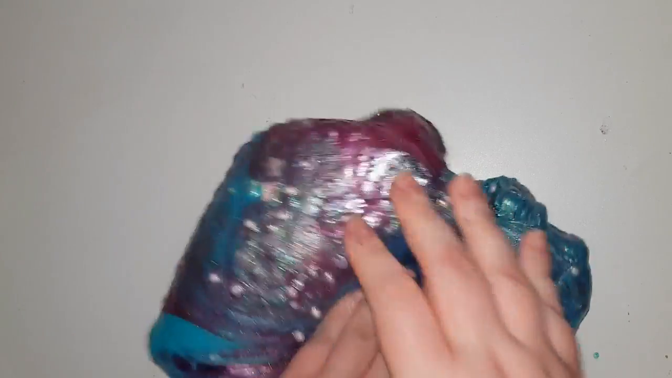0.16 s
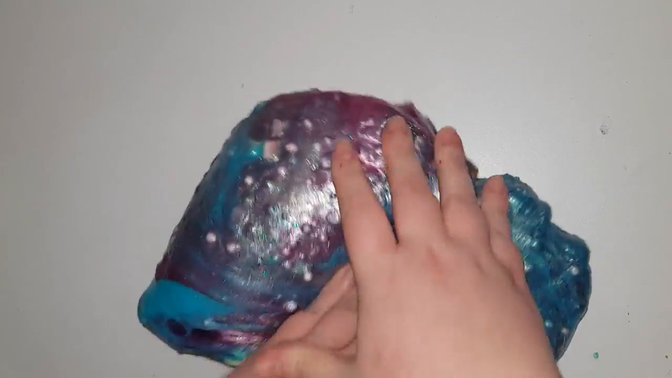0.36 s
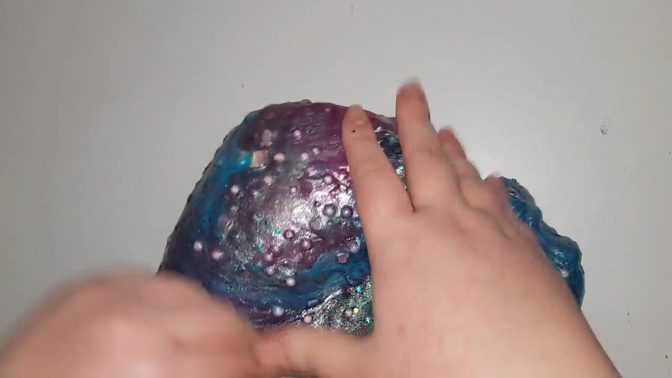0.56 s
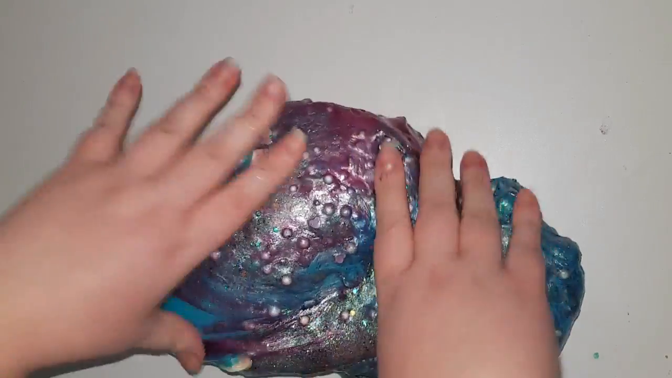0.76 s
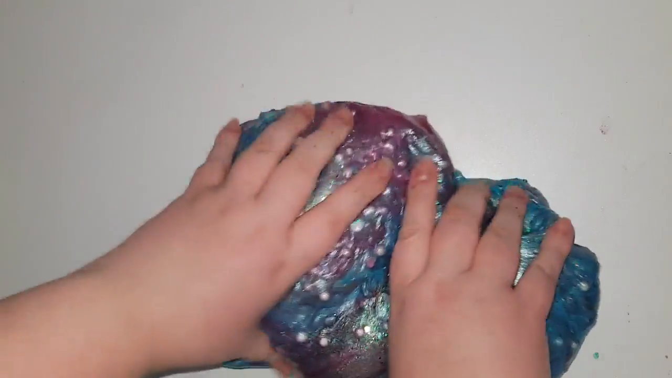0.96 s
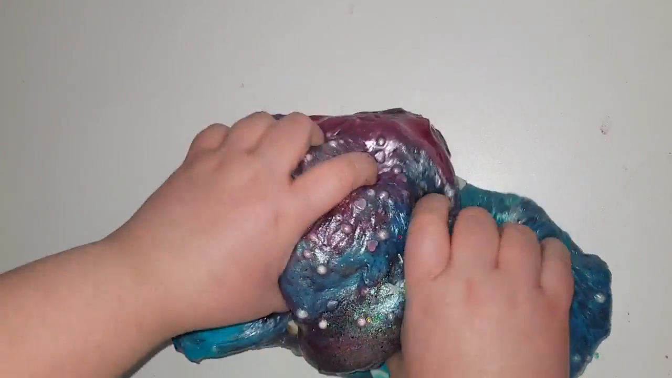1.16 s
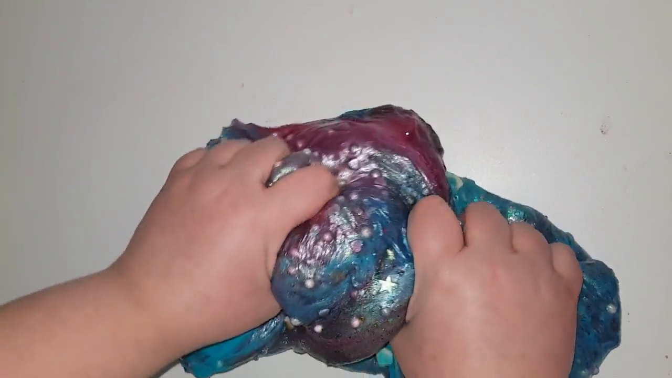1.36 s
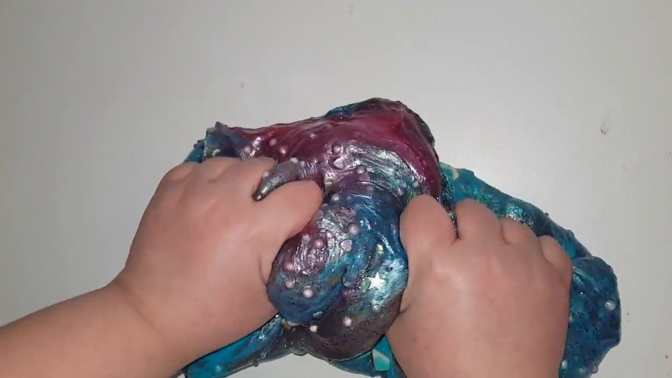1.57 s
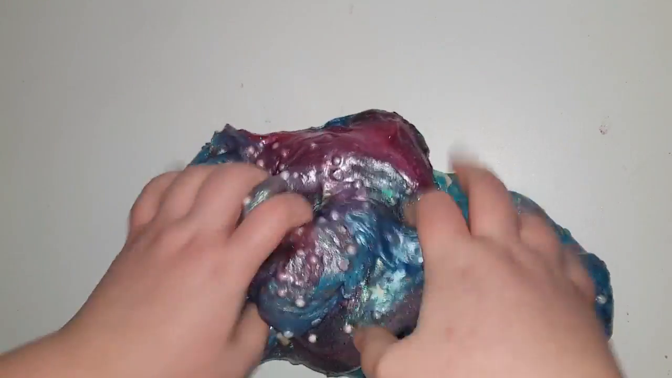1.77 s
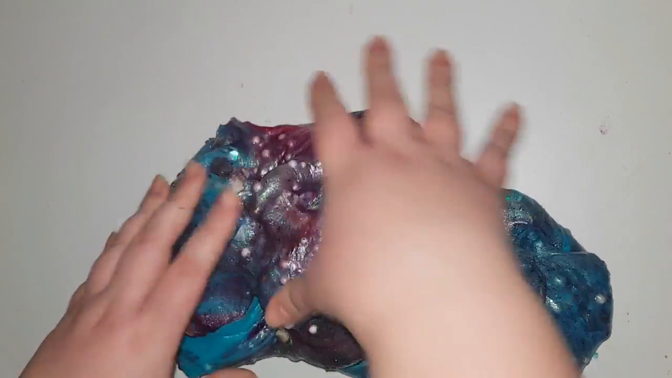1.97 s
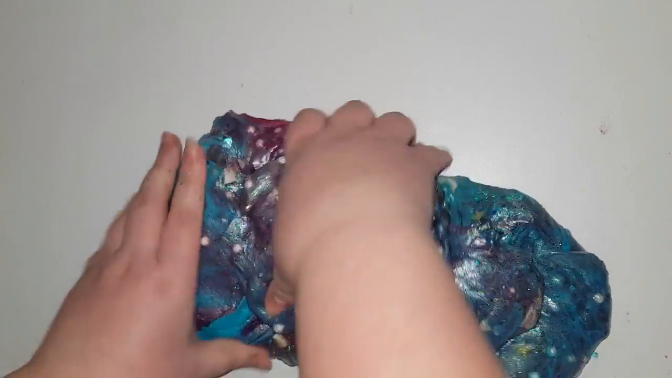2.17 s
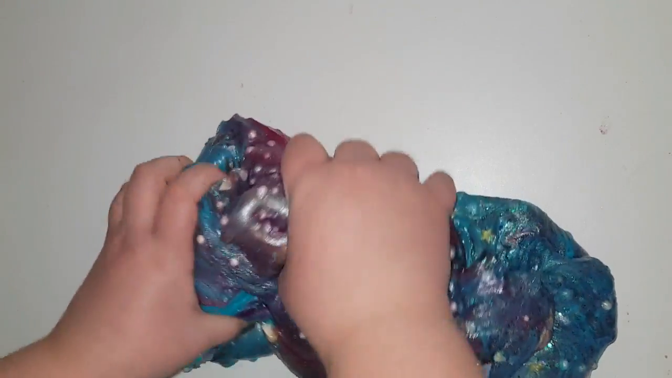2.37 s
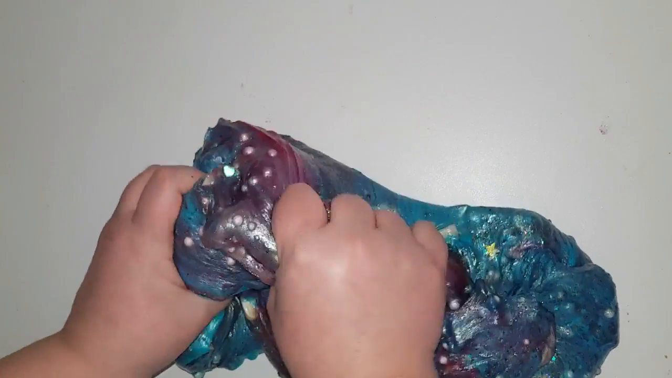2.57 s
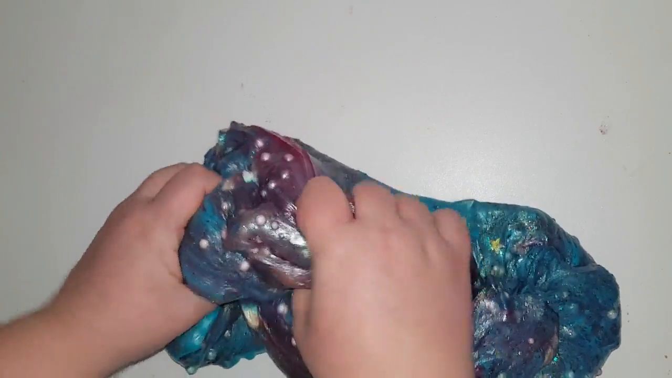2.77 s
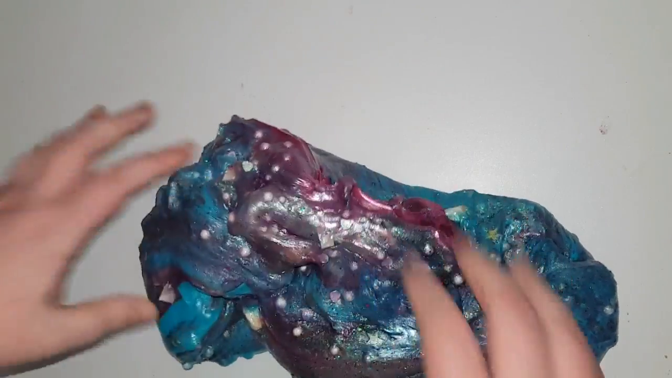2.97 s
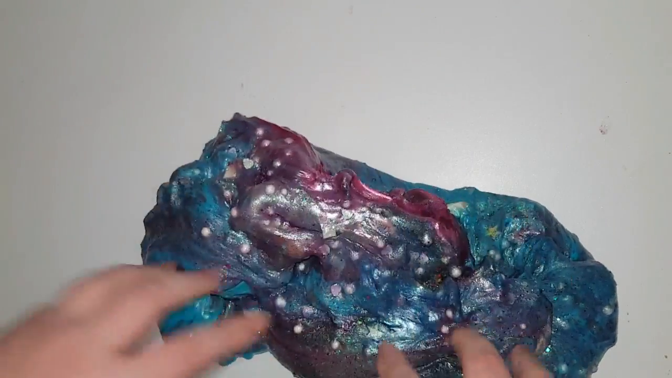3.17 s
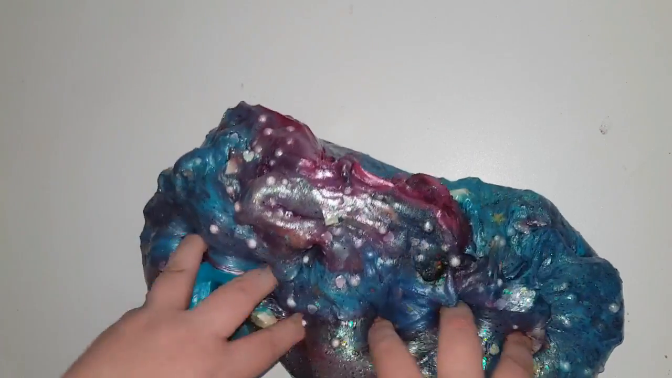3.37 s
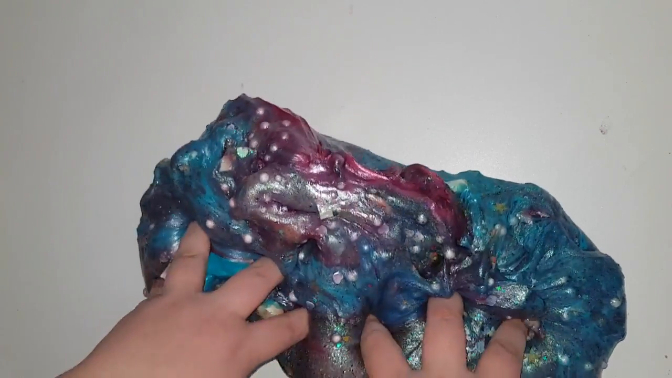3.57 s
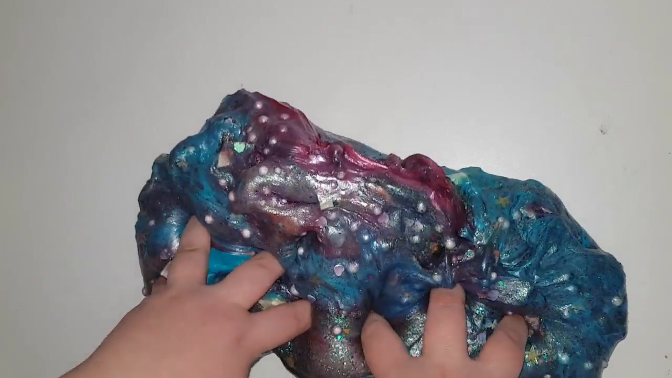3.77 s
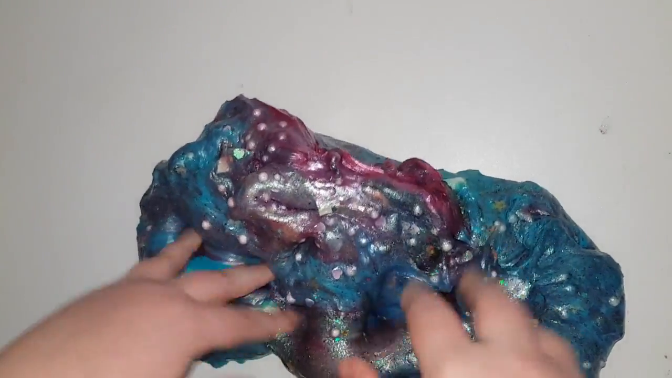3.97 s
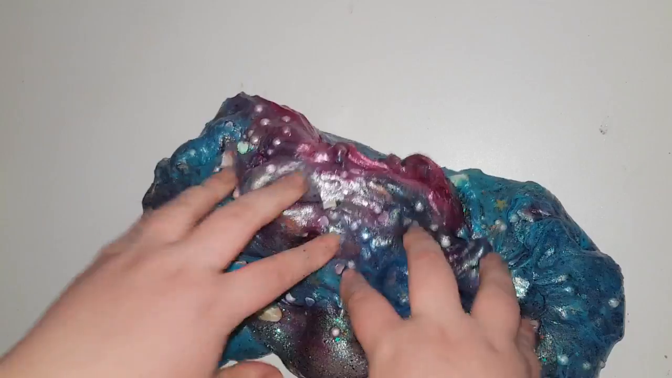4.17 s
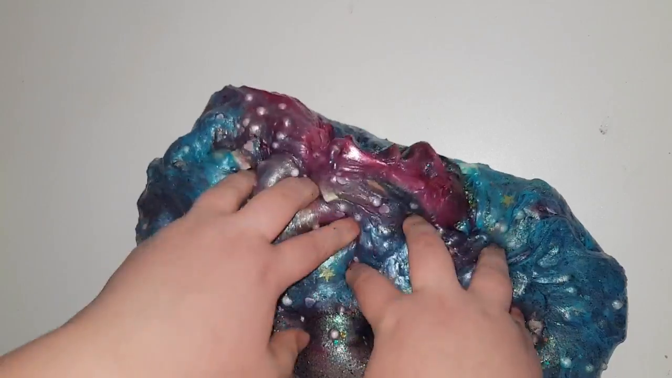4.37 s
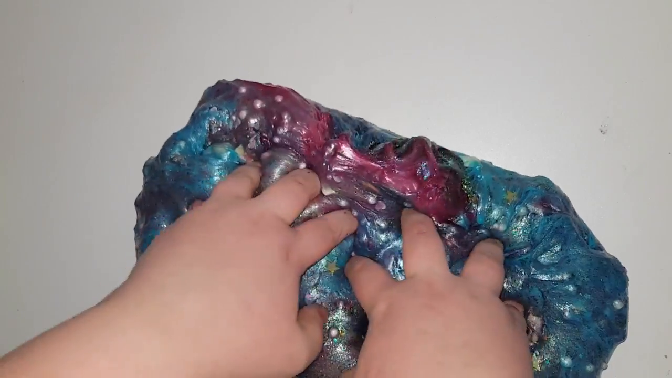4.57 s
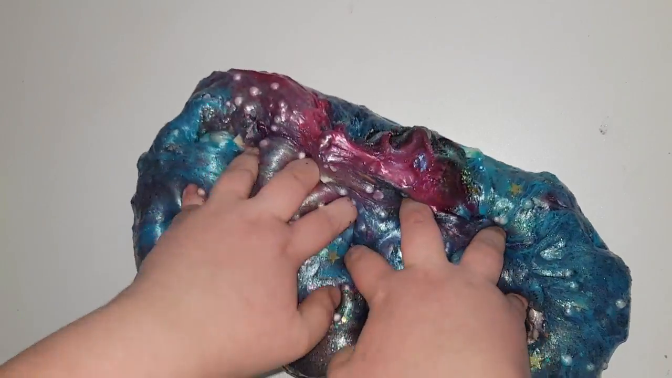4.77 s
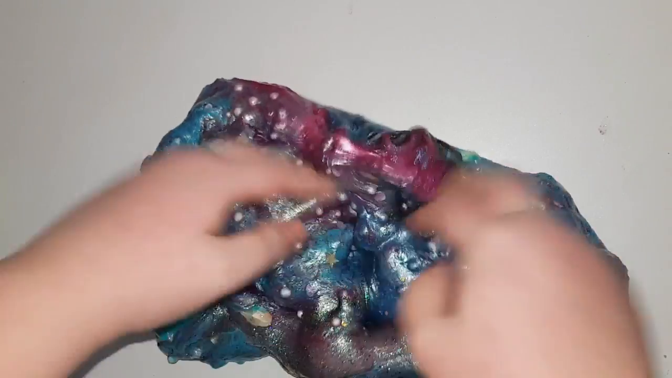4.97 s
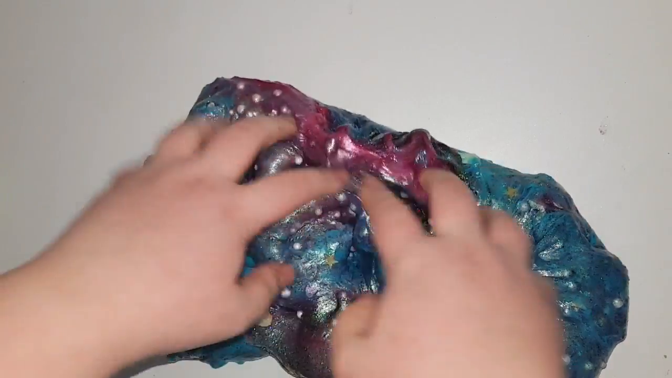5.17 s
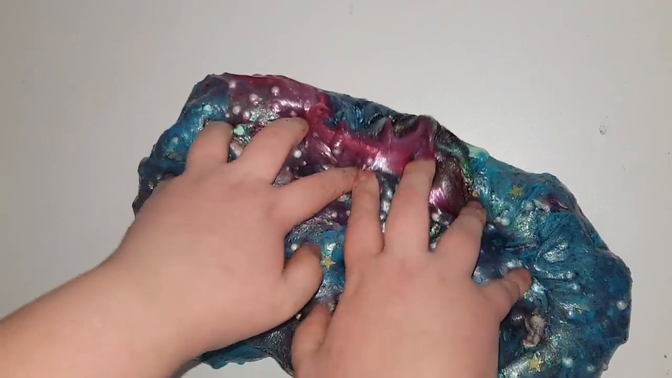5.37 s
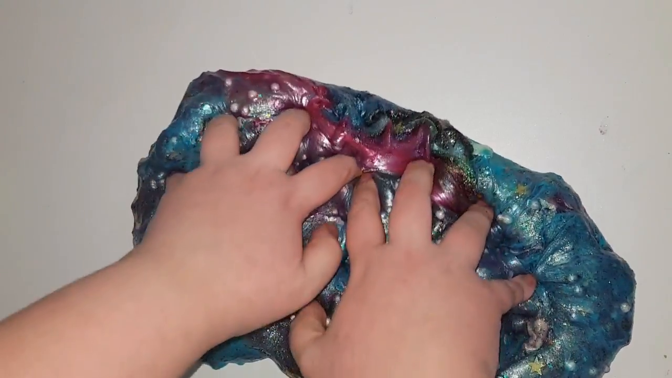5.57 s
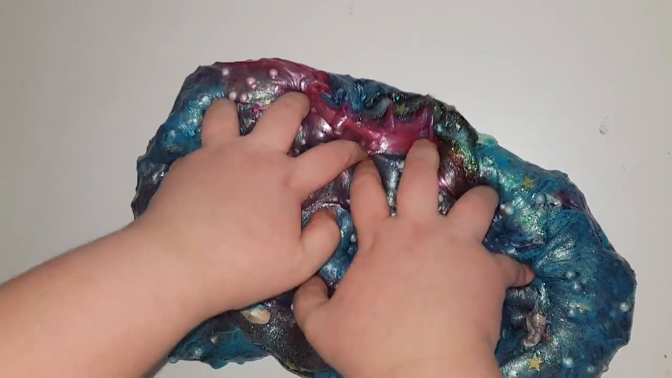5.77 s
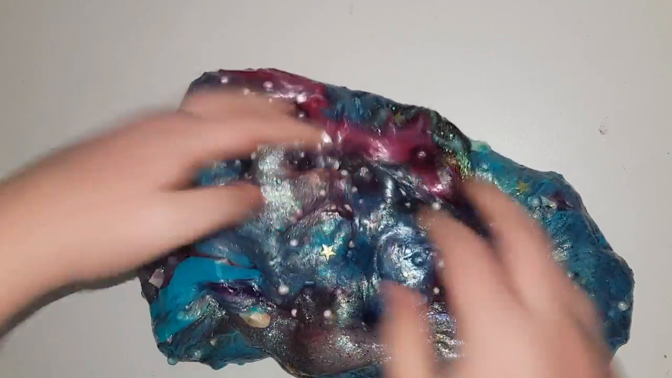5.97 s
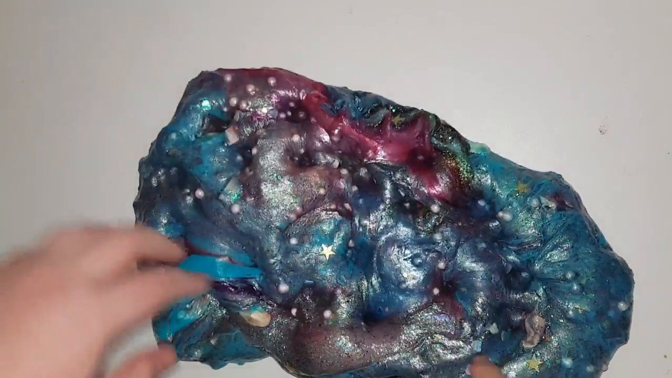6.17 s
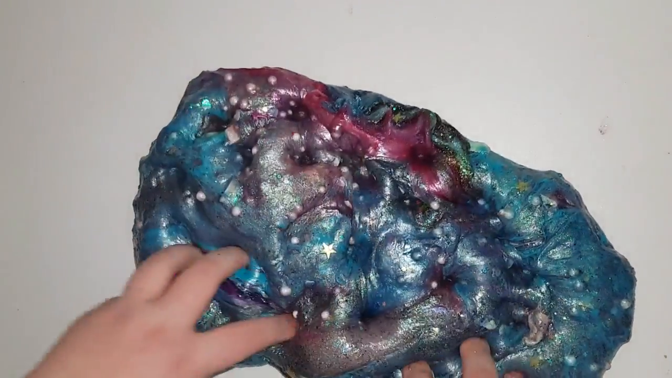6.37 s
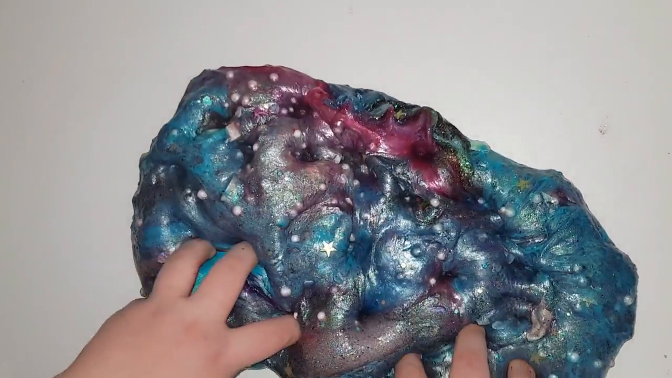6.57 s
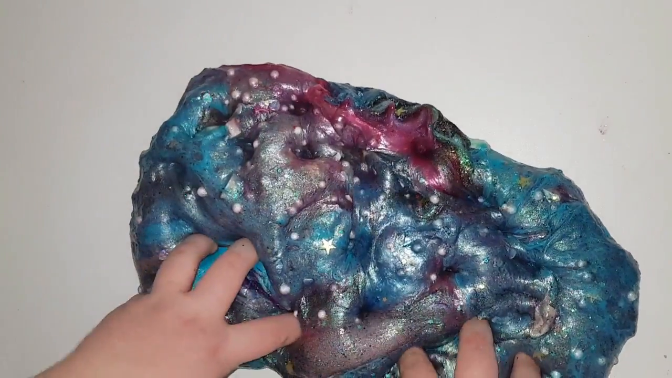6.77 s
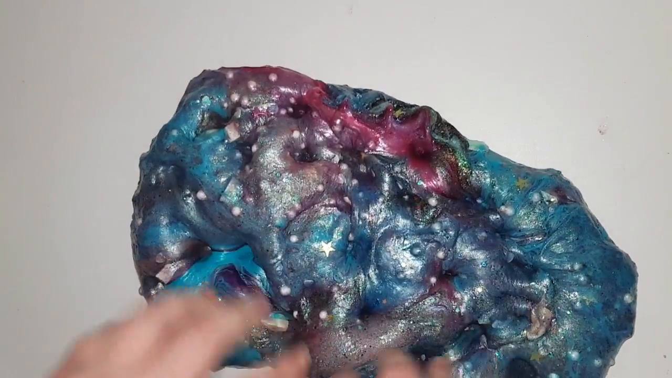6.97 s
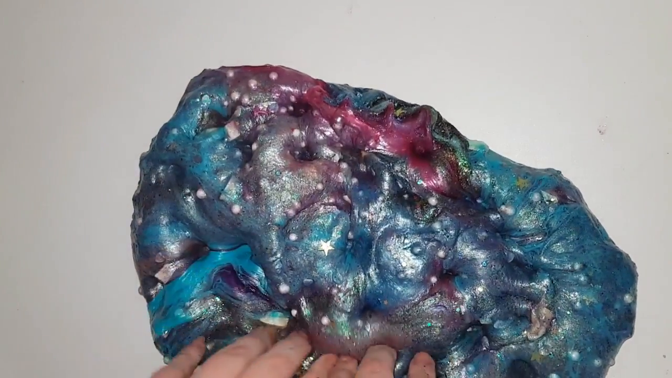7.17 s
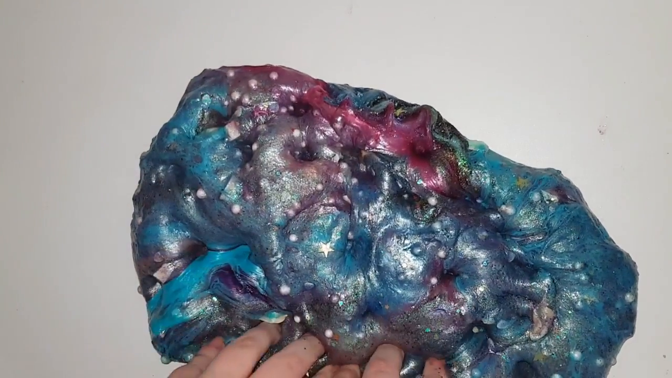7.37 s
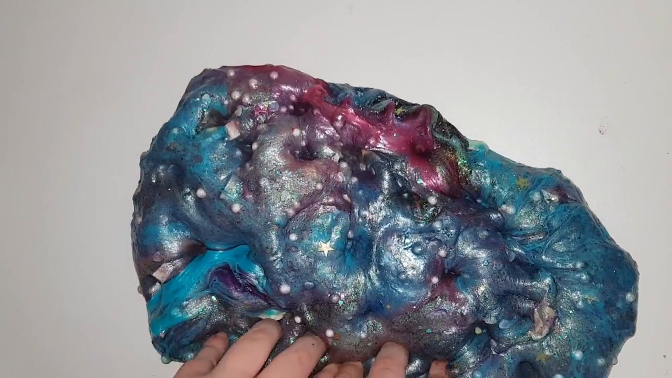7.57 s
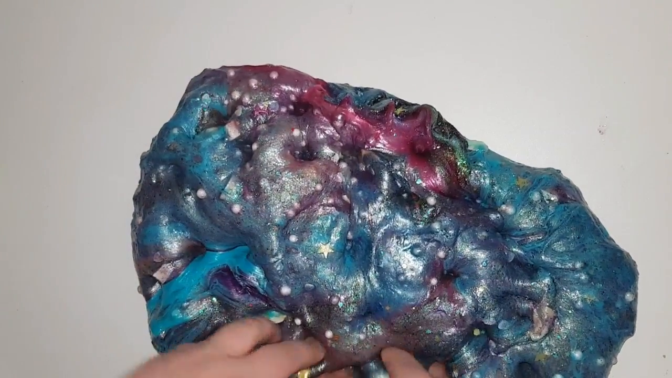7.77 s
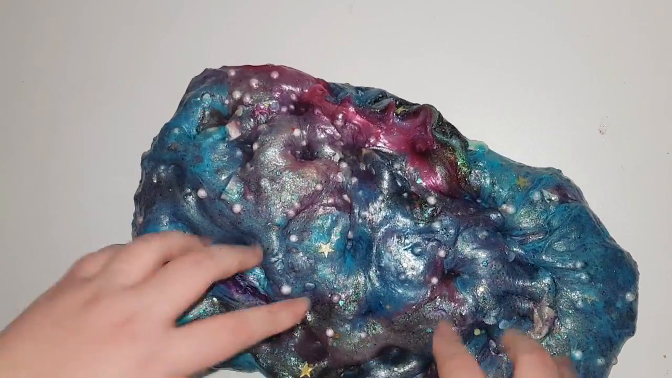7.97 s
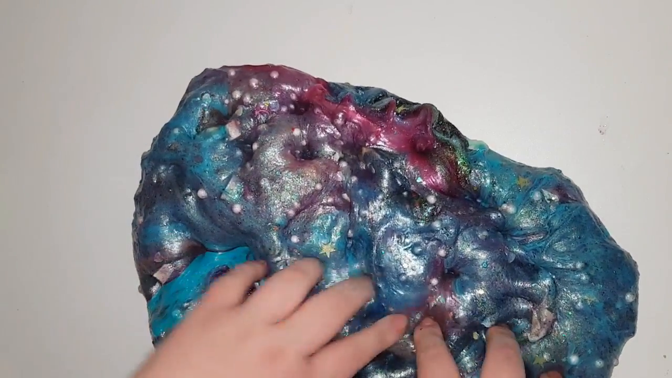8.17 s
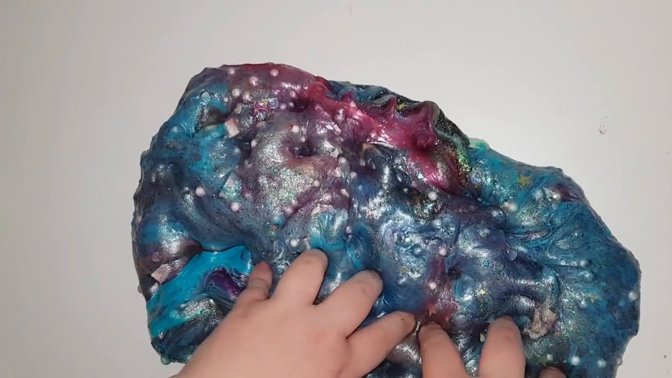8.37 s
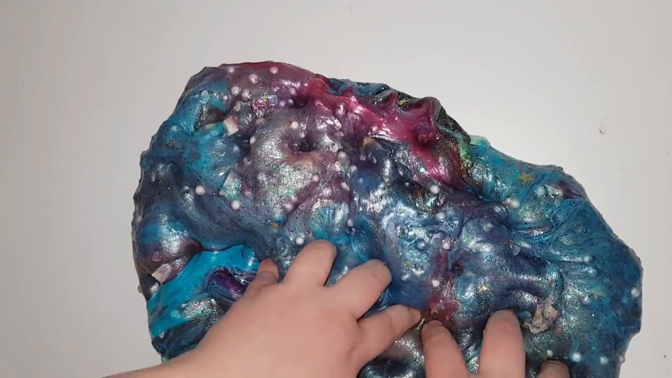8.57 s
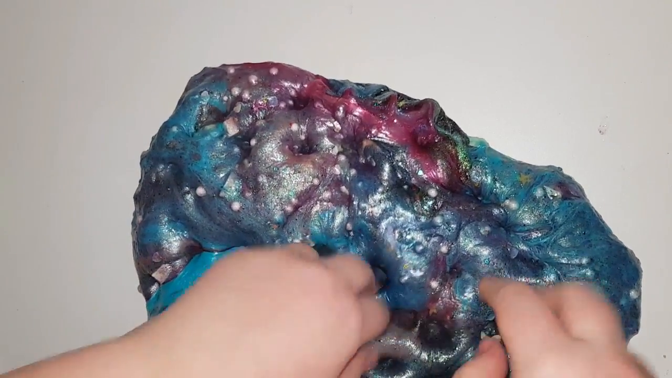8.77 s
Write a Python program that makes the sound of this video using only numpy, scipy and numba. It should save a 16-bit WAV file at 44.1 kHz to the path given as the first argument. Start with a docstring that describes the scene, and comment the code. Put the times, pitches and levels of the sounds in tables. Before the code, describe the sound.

Sticky slime is folded and poked by hand, giving sharp little snaps, wet crackles and low sucking sounds, with short pauses between. Light clicks come first, then bigger air pockets gulp and burst in separate clusters. Skin slides very faintly over the wet surface. The sound is close, with the pops stronger on the left, in a small, hard-walled room where a far motor hums softly.

```python
"""Sticky beaded slime on a table in a small, hard, quiet room, close to a phone's two microphones:
the left open, the right behind a narrow ringing port. A motor hums far off throughout.
From the start fingers pull out with a wet crackle and a low suck; trapped air pops, big pockets gulp
and skin glides over the wet surface. Past five seconds air squeaks through a pinched fold;
then dull pushes come between the pulls, and a last pull ends in a cluster of pops."""
import sys
import numpy as np
from scipy import signal
from scipy.io import wavfile
from scipy.ndimage import uniform_filter1d
from numba import njit

SR = 44100
rng = np.random.default_rng(int(sys.argv[2]) if len(sys.argv) > 2 else 0)


def inscribe(sig):
    """Save sig as 16-bit PCM at rate SR to the path in sys.argv[1].

    A 1-D sig is mono; a 2-D sig holds one channel per row.
    Samples are clipped to [-1, 1] before scaling.
    """
    pcm = np.round(np.clip(np.atleast_2d(sig).T, -1, 1) * 32767)
    wavfile.write(sys.argv[1], SR, pcm.astype(np.int16))


N = 388962


def undb(db):
    """Gain of a dB value."""
    return 10 ** (np.asarray(db) / 20)


def unit(x):
    """Scaled to rms 1."""
    return x / np.sqrt(np.mean(x ** 2))


def butter(x, order, hz, kind="low"):
    """Butterworth filter, low-pass by default."""
    return signal.lfilter(*signal.butter(order, hz, kind, fs=SR), x)


@njit
def bandpass(x, hz, width_hz):
    """State-variable band-pass, gain 1 at the centre."""
    y, band, low = np.empty(len(x)), 0., 0.
    g, damping = np.tan(np.pi * hz / SR), width_hz / hz
    for i in range(len(x)):
        v = (band + g * (x[i] + 1e-18 - low)) / (1 + g * (g + damping))
        band, low = 2 * v - band, low + 2 * g * v
        y[i] = damping * v
    return y


def ring(x, modes):
    """Sum of resonances; neighbours cancel into a valley between them."""
    return sum(undb(db) * bandpass(x, hz, width_hz) for hz, width_hz, db in modes)


def grains(per_s, spread_db):
    """Random clicks, most small and a few large."""
    when, strength, polarity = rng.random((3, N))
    size = undb(-spread_db * np.log(1 - strength)) * np.sign(polarity - .5)
    return unit(size * (when < per_s / SR))


def noise_bands(table, shape, n=N):
    """Half-octave stereo noise, alike in the bass; shape(table value) is each band's gain or envelope."""
    hz, value = np.transpose(table)
    out = 0
    for band_hz in 35 * 2 ** np.arange(0, 9, .5):
        weight = shape(np.interp(np.log(band_hz), np.log(hz), value))
        mid, side = (bandpass(rng.standard_normal(n), band_hz, band_hz / 3) for _ in range(2))
        spread = min((band_hz / 600) ** 1.2, 1)
        out = out + weight * (mid + spread * np.array([side, -side]))
    return out


# Room tone at the microphones: frequency_hz, relative_density_db
ROOM_TONE = [(40, 7), (100, -10), (160, -28.5), (230, -7.5), (700, -10), (1000, -21.5), (1500, -14.5),
             (3700, -43.5), (5000, -13.5), (10000, -64.5)]
# The far motor: pitch_hz, level_db
MOTOR_HUM = [(96.9, -71.5), (145.3, -71), (640.6, -79)]


def background(air_db=-69, rumble_db=-74, whirr_db=-76):
    """A distant motor hums and wavers under gently swelling room air, a rumble and a thin whirr."""
    hum = sum(undb(db) * unit(bandpass(rng.standard_normal(N), hz, 5.6)) for hz, db in MOTOR_HUM)
    rumble = unit(np.array([bandpass(x, 55, 37.8) for x in rng.standard_normal((2, N))]))
    whirr = unit(np.array([bandpass(x, 2830, 160) for x in rng.standard_normal((2, N))]))
    drift = uniform_filter1d(rng.standard_normal(N), SR // 2)
    swell_db = 1.5 * unit(uniform_filter1d(drift, SR // 2))
    air = undb(air_db + swell_db) * unit(noise_bands(ROOM_TONE, undb))
    return air + undb(rumble_db) * rumble + undb(whirr_db) * whirr + hum


def grip(strokes, let_go_s=0.041):
    """Envelope of finger strokes: each rises, holds until its length has passed, then dies away."""
    out, t = np.zeros(N + SR), np.arange(SR // 2) / SR
    for start_s, length_s, rise_s, db in strokes:
        shape = np.minimum(t / rise_s, 1) ** 2 * np.exp(-np.maximum(t - length_s, 0) / let_go_s)
        at = int(start_s * SR)
        out[at:at + len(t)] += undb(db) * shape
    return out[:N]


# Fingers pulling out: start_s, length_s, suck_db, peel_db
PULLS = [(0.105, 0.13, -57, -58), (0.438, 0.076, -60, -61), (1.024, 0.15, -62, -64.5),
         (1.156, 0.14, -56, -59), (1.332, 0.039, -55, -61), (1.692, 0.16, -46, -48.5),
         (1.83, 0.047, -43.5, -66), (2.185, 0.04, -47, -57.5), (2.581, 0.045, -85, -43.5),
         (2.811, 0.14, -46.5, -45.5), (3.27, 0.18, -72, -62), (3.918, 0.14, -37.5, -46.5),
         (4.955, 0.065, -35.5, -38.5), (5.925, 0.095, -39, -46), (6.885, 0.059, -36.5, -41),
         (7.815, 0.055, -39, -41.5), (8.734, 0.04, -35, -33)]
# Colour of skin peeling off, heard close: centre_hz, width_hz, relative_db
PEEL_BANDS = [(1650, 2750, 10), (4200, 23000, 39.5), (11600, 5900, 8)]
# Resonances of the slime and table top: centre_hz, width_hz, relative_db
SUCK_MODES = [(150, 180, 6.5), (505, 180, 1.5), (856, 22, 1), (1167, 120, 1.5)]
# Fingers pushing in: start_s, level_db
PRESSES = [(5.75, -50), (5.863, -56.5), (6.677, -40.5), (8.581, -53)]


def squishes(press_s=0.062, press_rise_s=0.00566, peel_rise_share=0.27, suck_rise_share=0.48):
    """A pull tears threads, then sucks; a push tugs dully at once. Both make the table shudder."""
    peel = grip([(s, length, peel_rise_share * length, db) for s, length, _, db in PULLS])
    suck = grip([(s, length, suck_rise_share * length, db) for s, length, db, _ in PULLS])
    push = grip([(s, press_s, press_rise_s, db) for s, db in PRESSES])
    tearing = grains(per_s=900, spread_db=2.7) + 0.3 * rng.standard_normal(N)
    tugs = butter(grains(per_s=700, spread_db=1.8), 2, 1600)  # slime is soft: no sharp edges
    tugs = unit(ring(tugs, SUCK_MODES))
    padded = unit(butter(tugs, 2, 500))  # fingertips are softer still
    shudder = np.array([bandpass((push + suck) * noise, 59, 90) / np.std(bandpass(noise, 45, 35))
                        for noise in rng.standard_normal((2, N))])  # its own at each microphone
    pockets_hz = 700 * 1.4 ** np.arange(7.)  # small pockets of every size ring a few cycles
    bubbles = unit(sum(bandpass(grains(per_s=30, spread_db=2.2), hz, hz / 7) for hz in pockets_hz))
    crackle = unit(ring(tearing, PEEL_BANDS)) + undb(-2) * bubbles
    return push * padded + suck * tugs + peel * crackle, undb(-14) * shudder


def cavity(x, hz, round_below_hz=8000):
    """An air pocket: low-pitched ones are rounder and ring, higher ones mostly crack."""
    ratio = hz / round_below_hz
    crack = (hz, 1.7 * hz * min(ratio, 1), 0)
    tone = (hz, hz / 9, 7 - 20 * max(ratio - 1, 0))
    return ring(bandpass(x, hz, 1.8 * hz), [crack, tone])


# Air pockets bursting close by: time_s, peak_db, pitch_hz
POPS = [(0.1537, -22.5, 4530), (0.58, -42, 4900), (1.0075, -25.5, 9000), (1.0598, -15, 12000),
        (1.0699, -31, 2790), (1.145, -32, 9300), (1.2138, -28, 8000), (1.2545, -22.5, 8000),
        (1.3186, -11, 11260), (1.321, -10, 10260), (1.3448, -33, 2700), (1.432, -24.5, 4670),
        (1.458, -23, 5600), (1.47, -19.5, 7740), (1.4764, -8, 5570), (1.757, -22.5, 3000),
        (1.798, -20.5, 3120), (1.827, -20.5, 4500), (1.8484, -7.5, 3740), (1.849, -6, 7150),
        (1.8695, -14, 2496), (2.2091, -31, 2510), (2.353, -20, 11600), (2.586, -10, 10200),
        (2.5551, -24, 8000), (2.5992, -5.5, 8000), (2.8531, -19.5, 6350), (2.8548, -26.5, 2490),
        (3.3193, -15, 12090), (3.4328, -31, 4900), (3.946, -22, 8990), (3.9715, -17, 6360),
        (3.991, -16.5, 3000), (4.0213, -15, 4750), (4.0332, -5, 7060), (4.038, -13.5, 2645),
        (4.612, -29, 11500), (4.9594, -19.5, 8000), (4.9769, -17.5, 2690), (5.007, -13, 8000),
        (5.0155, -14.5, 5180), (5.304, -35.5, 8900), (5.498, -29.5, 7600), (5.5403, -24, 9300),
        (5.799, -38, 7500), (5.954, -23.5, 2940), (5.9725, -8.5, 7850), (6.031, -22.5, 3490),
        (6.683, -33.5, 2456), (6.9051, -5, 4220), (6.908, -8.5, 6500), (6.915, -13, 4200),
        (6.9302, -14, 3100), (6.9366, -9.5, 6770), (7.2542, -33.5, 4200), (7.473, -20.5, 10100),
        (7.5122, -17.5, 7950), (7.519, -31, 7500), (7.5388, -20, 9600), (7.597, -25, 7550),
        (7.6152, -17.5, 6370), (7.811, -25, 3570), (7.8245, -21, 3170), (7.8501, -8, 9540),
        (8.7425, -16, 2850), (8.7676, -10, 4210), (8.8088, -11, 5500), (8.814, -10, 7450)]


def pops(rise_share=.9, scatter_ms=6, scatter_db=(-5, -9)):
    """A film tears and air rushes out, ringing its cavity: direct puffs, snaps for the walls, scatter."""
    t_ms = np.arange(1024) * 1000 / SR
    direct, snaps, scattered = np.zeros(N + 2048), np.zeros(N + 2048), np.zeros((2, N + 2048))
    for time_s, db, hz in POPS:
        rush = rng.standard_normal(len(t_ms))
        decay_ms = 13 * np.exp(0.12 * db) * 1000 / hz  # 13 cycles at 0 dB; weaker pops are shorter
        rise_ms = rise_share * decay_ms
        rush[int(rise_ms * SR / 1000)] = 2.5  # the film snaps at the height of the rush
        puff = cavity(rush * np.exp(-t_ms / decay_ms) * np.minimum((t_ms + 0.016) / rise_ms, 1), hz)
        puff *= undb(db) / np.abs(puff).max()
        snap = cavity(1. * (t_ms == 0), hz)
        snap *= np.sqrt(np.sum(puff ** 2) / np.sum(snap ** 2))
        # scatter off hands and table to the left and right microphones, new for every spot
        echoes = rng.standard_normal((2, len(t_ms))) ** 3 * np.exp(-t_ms / scatter_ms) * (t_ms > .8)
        echoes *= undb(scatter_db)[:, None] / np.linalg.norm(echoes, axis=1, keepdims=True)
        at = int(time_s * SR - rise_ms * SR / 1000)
        direct[at:at + len(t_ms)] += puff
        snaps[at:at + len(t_ms)] += snap
        scattered[:, at:at + 2 * len(t_ms) - 1] += signal.fftconvolve(snap[None], echoes, axes=1)
    return direct[:N], snaps[:N], scattered[:, :N]


# Big pockets gulping and the lump bumping the table: start_s, level_db, pitch_hz
GULPS = [(0.209, -39.5, 43.7), (1.192, -35, 650), (1.256, -30.5, 730), (1.76, -25.5, 110),
         (1.873, -21.5, 1060), (2.177, -33, 87.3), (2.899, -34.5, 313), (2.956, -28, 1200),
         (3.515, -44.5, 46.4), (3.672, -44, 85), (3.96, -25, 178), (3.999, -18.5, 161), (3.999, -12.5, 436),
         (4.038, -18, 1278), (4.052, -32, 194), (4.975, -24.5, 150), (5.009, -16.5, 448),
         (5.015, -11.5, 910), (5.757, -43, 254), (6.017, -25.5, 177.4), (6.018, -17.5, 563),
         (6.755, -38, 144), (6.92, -26, 122), (6.939, -20, 334), (7.565, -44, 89), (7.665, -41, 104),
         (7.752, -42, 167), (7.838, -25.5, 134), (8.575, -35, 130), (8.749, -29, 587), (8.768, -20, 1290)]


def gulps(decay_cycles=1.6, glide=.15):
    """Each bump rings a cycle or two and rises in pitch as the pocket under it opens."""
    out, t = np.zeros(N + SR // 4), np.arange(SR // 4) / SR
    for start_s, db, hz in GULPS:
        cycles = hz * t
        bend = 1 + glide * np.minimum(cycles / decay_cycles, 2) / 2
        envelope = np.exp(-cycles / decay_cycles) * np.minimum(cycles, 1)
        at = int(start_s * SR)
        out[at:at + len(t)] += undb(db) * envelope * np.sin(2 * np.pi * cycles * bend)
    return out[:N]


# Fingers gliding on the slime: middle_s, length_s, level_db, centre_hz
SLIDES = [(0.507, 0.34, -59.5, 4900), (1.345, 0.87, -59.5, 7200), (2.448, 0.35, -57, 6200),
          (3.148, 1, -64.5, 4230), (5.555, 0.84, -59, 4440), (8.264, 0.26, -56, 4110),
          (8.523, 0.16, -54, 3820)]


def slides(tick_db=-9):
    """Skin glides over the wet surface: a hiss that swells and fades, with tiny bubbles ticking in it."""
    out = np.zeros(N + SR)
    ticks = undb(tick_db) * unit(bandpass(grains(per_s=17, spread_db=5.9), 8000, 7000))
    noise = rng.standard_normal(N)
    for middle_s, length_s, db, hz in SLIDES:
        span = slice(int((middle_s - length_s / 2) * SR), int((middle_s + length_s / 2) * SR))
        hiss = bandpass(bandpass(noise[span], hz, 2 * hz), hz, 2 * hz)
        swell = np.sin(np.linspace(0, np.pi, len(hiss)))
        out[span] += undb(db) * swell * (unit(hiss) + ticks[span])
    return out[:N]


# Faint whistles from a fold: start_s, length_s, level_db, pitch_hz
SQUEAKS = [(5.34, 0.21, -65, 7700), (5.4, 0.16, -64, 4400), (5.6, 0.22, -64, 7700), (5.59, 0.13, -63, 4500)]


def squeaks(width_hz=380, climb=.04):
    """Air squeezed through a pinched fold: a thin, wavering whistle that swells, climbs and fades."""
    out = np.zeros(N)
    for start_s, length_s, db, hz in SQUEAKS:
        t = np.arange(int(length_s * SR)) / SR
        waver = uniform_filter1d(rng.standard_normal((2, len(t))), int(SR / width_hz), axis=1)
        phase = 2 * np.pi * hz * t * (1 + climb * (t / length_s - 1) / 2)
        whistle = unit(waver[0] * np.sin(phase) + waver[1] * np.cos(phase))
        at = int(start_s * SR)
        out[at:at + len(t)] += undb(db) * np.sin(np.pi * t / length_s) * whistle
    return out


# Time the small room takes to die away by 60 dB: frequency_hz, decay_s
ROOM_DECAY = [(100, 0.55), (300, 0.28), (800, 0.44), (2000, 0.27), (5000, 0.42), (12000, 0.26)]


def room(source, reverb_db=-10.5):
    """Hard, near walls answer at once and ring for up to half a second, longest in the bass."""
    t = np.arange(SR // 2) / SR
    tail = noise_bands(ROOM_DECAY, lambda decay_s: np.exp(-np.log(1000) * t / decay_s), len(t))
    tail *= 1 - np.exp(-t / 0.000091)
    tail *= undb(reverb_db) / np.sqrt(np.sum(tail ** 2) / 2)
    return signal.fftconvolve(source[None], tail, axes=1)[:, :N]


def scene(shadow_hz=1660, hidden_pops_db=-14, lag_samples=9):
    """The right microphone faces away: sound comes later and duller; hands and phone hide the pops."""
    direct, snaps, scattered = pops()
    squish, shudder = squishes()
    kneading = gulps() + squish + slides() + squeaks()
    left = direct + kneading
    right = butter(np.roll(undb(hidden_pops_db) * direct + kneading, lag_samples), 1, shadow_hz)
    return np.array([left, right]) + scattered + shudder + room(snaps + kneading) + background()


# The left microphone's open inlet: centre_hz, width_hz, gain_db
LEFT_INLET = [(2400, 3000, -9.5)]
# The right microphone's narrow port: centre_hz, width_hz, gain_db
RIGHT_PORT = [(2574, 370, 22.5), (4440, 980, 9.5), (4900, 180, 14.5), (11140, 5100, 7.5)]


def record(dry, hiss_db=-71.5, low_cut_hz=32, top_hz=16200):
    """The left inlet lifts the presence; the right port rings and dulls the treble; both hiss."""
    left = dry[0] + ring(dry[0], LEFT_INLET)
    right = butter(dry[1], 2, 3700) + ring(dry[1], RIGHT_PORT)
    out = np.array([left, right]) + undb(hiss_db) * rng.standard_normal((2, N))
    out = butter(out, 2, low_cut_hz, "high")
    return signal.sosfilt(signal.ellip(10, .2, 90, top_hz, fs=SR, output="sos"), out)


dry = scene()
out = record(dry)
inscribe(out)
```